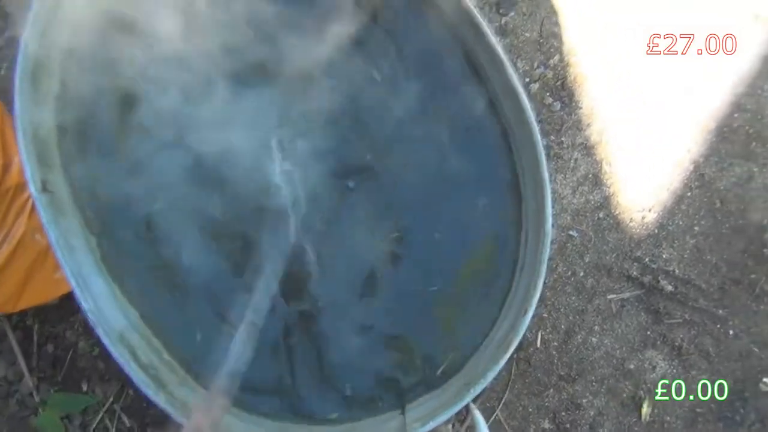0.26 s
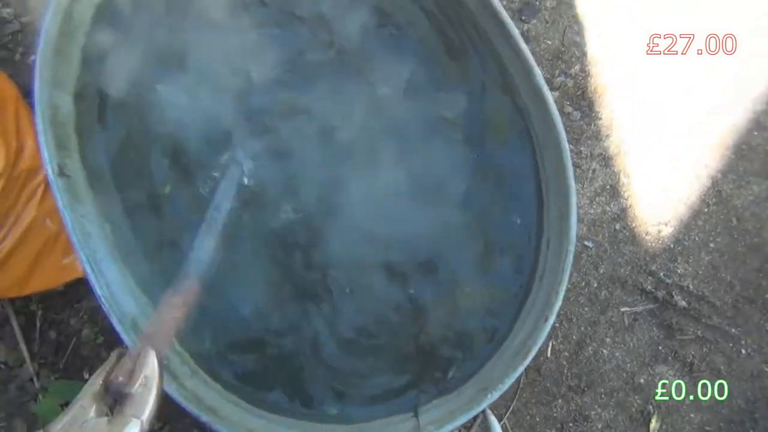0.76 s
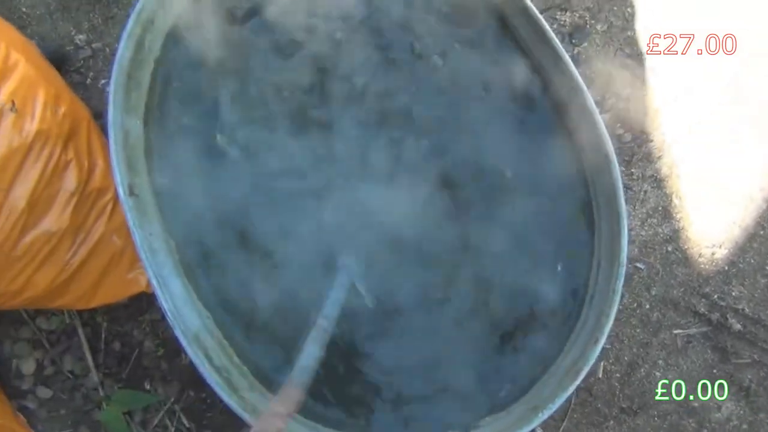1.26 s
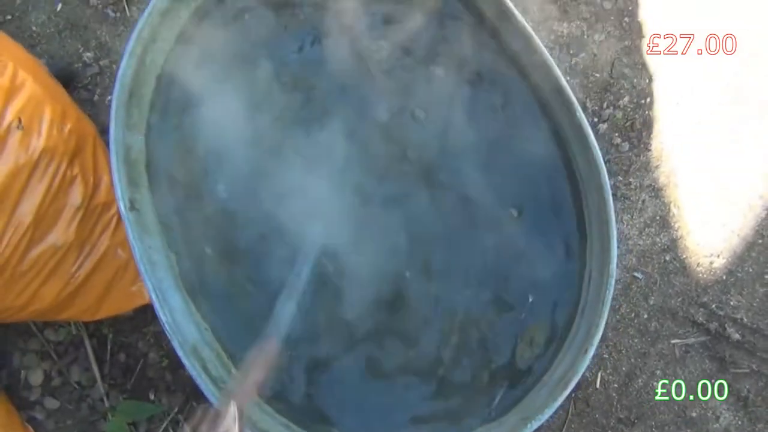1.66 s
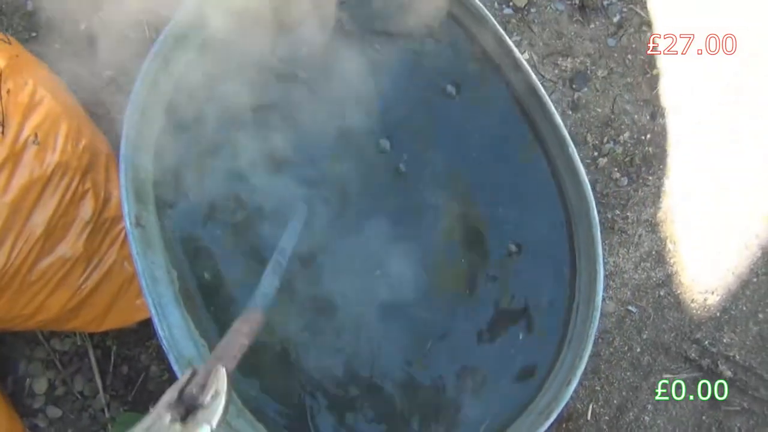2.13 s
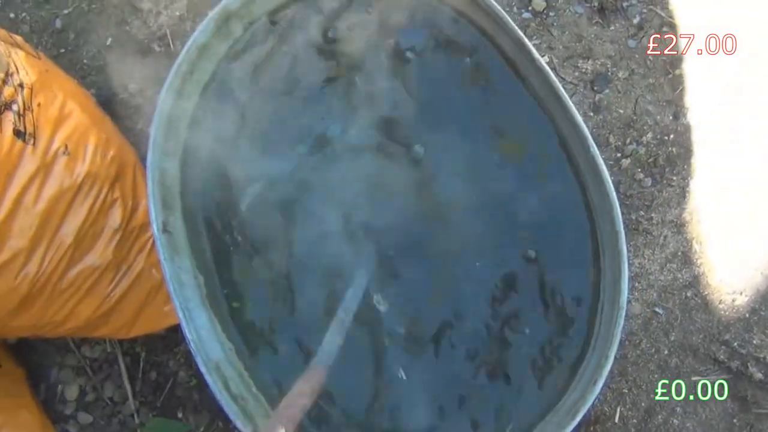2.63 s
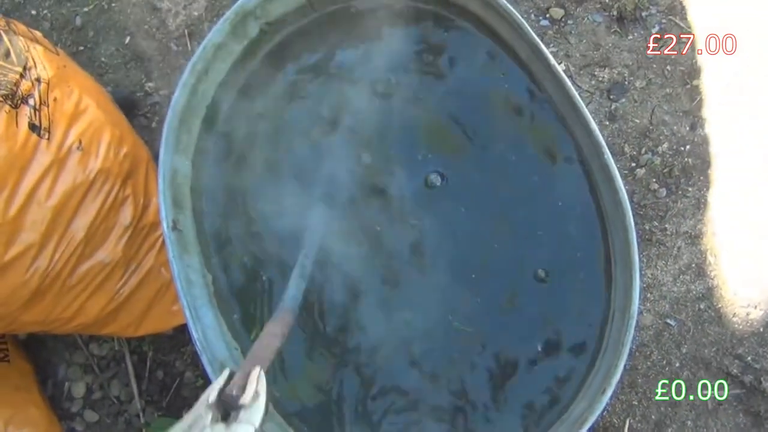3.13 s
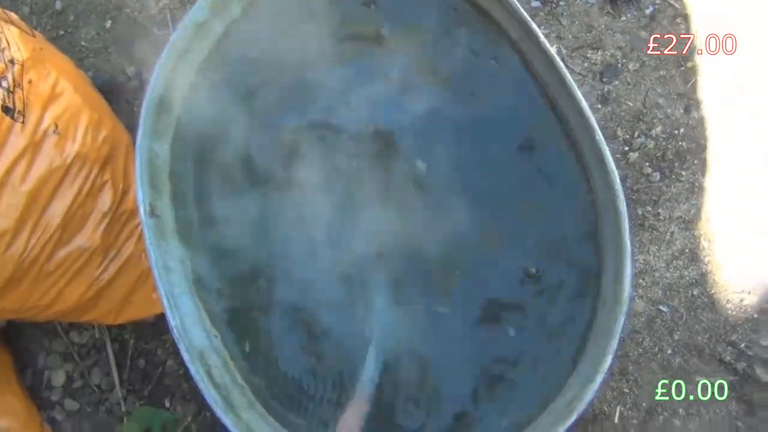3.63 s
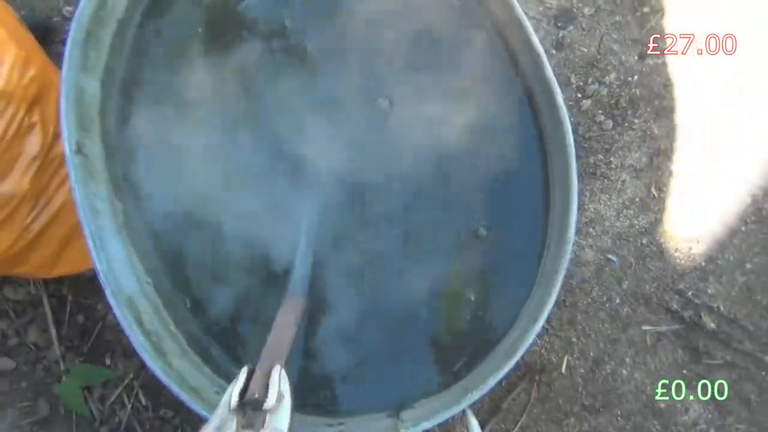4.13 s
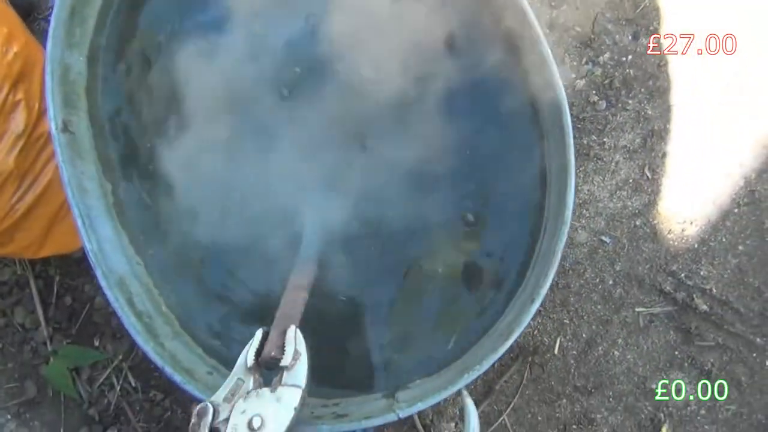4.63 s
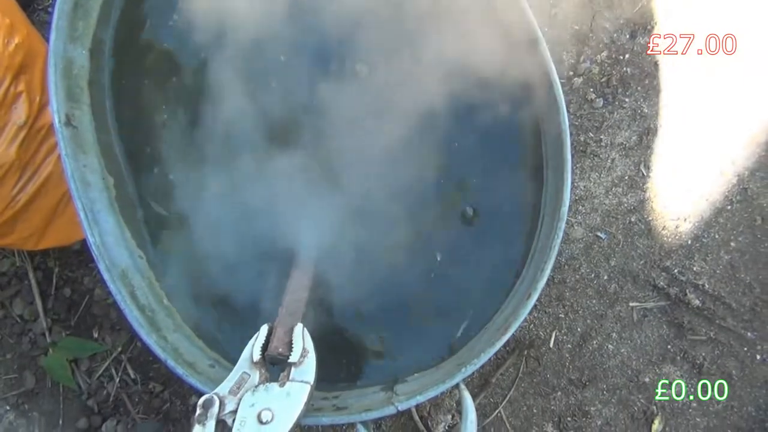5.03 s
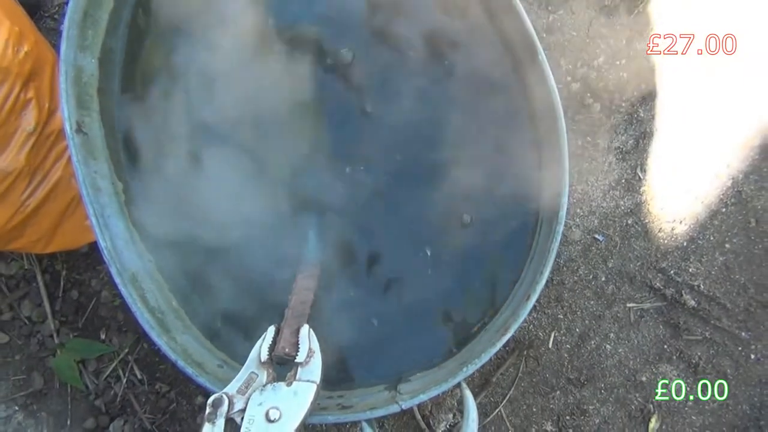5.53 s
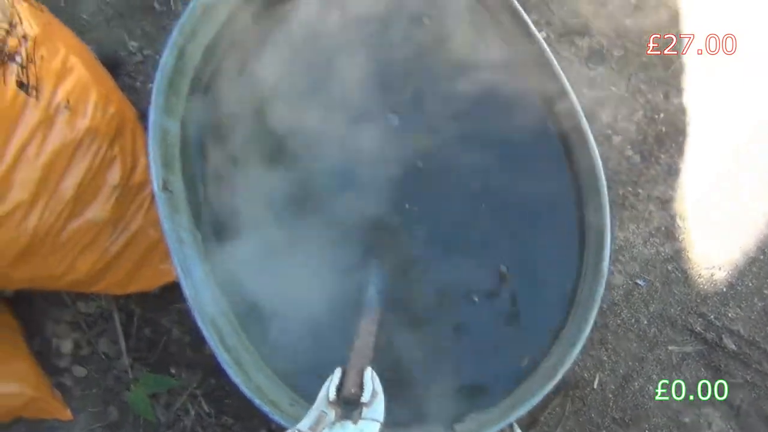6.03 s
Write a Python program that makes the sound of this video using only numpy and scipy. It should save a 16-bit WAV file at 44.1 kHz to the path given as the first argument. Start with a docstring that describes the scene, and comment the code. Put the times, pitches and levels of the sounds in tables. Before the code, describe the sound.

Close up, a hot metal bar sizzles and squawks in water, pushed deeper it cracks and gurgles roughly, then settles to simmering hiss.

```python
"""Hot steel bar stirred in a tub

A red-hot steel bar, held in tongs, is stirred in a tub of water in a yard, heard from close by.
Tiny steam bubbles hiss in surges, the water boils, and vapour pockets chirp as they swell and shrink.
Pushed deeper, the bar sheds its steam jacket in rough bursts and gurgles that ring the tub.
Noise and clicks drive filters and gliding resonances; a fast limiter holds down the loud moments."""
import sys
import numpy as np
from scipy import signal
from scipy.fft import rfft, irfft
from scipy.io import wavfile
from scipy.ndimage import uniform_filter1d

SR = 44100
rng = np.random.default_rng(int(sys.argv[2]) if len(sys.argv) > 2 else 0)


def master_out(mix):
    """Clip the mix to full scale and print it as 16-bit PCM to the path in sys.argv[1]."""
    frames = np.transpose(np.atleast_2d(mix))
    ceiling = np.clip(frames, -1, 1)
    pcm = np.round(ceiling * 32767).astype(np.int16)
    wavfile.write(sys.argv[1], SR, pcm)


N = 277389
TIME = np.arange(N) / SR
FRAME, HOP = 256, 64  # spectrogram frame and step [samples]


def gain_of(db):
    """Decibels to amplitude."""
    return 10 ** (np.asarray(db) / 20)


def evened(x):
    """Scales to rms 1."""
    return x / np.sqrt(np.mean(x ** 2) + 1e-20)


def read(points, hz):
    """Reads a spectrum on a log-frequency axis."""
    f, value = np.transpose(points)
    return np.interp(np.log(hz + 1), np.log(f + 1), value)


def add(mix, s, sound):
    """Mixes a sound in at s seconds."""
    part = mix[round(s * SR):][:len(sound)]
    part += sound[:len(part)]


def colour(x, points, size=4096):
    """Causal minimum-phase filter with the given spectrum: clicks keep their sharp fronts."""
    log_gain = np.log(gain_of(read(points, abs(np.fft.fftfreq(size, 1 / SR)))))
    taps = np.fft.ifft(np.exp(np.conj(signal.hilbert(log_gain)))).real
    return signal.oaconvolve(x, taps[:size // 2])[:len(x)]


def resonate(x, hz, width_hz):
    """One-pole resonance of gain 1 whose pitch can follow a curve."""
    turn = np.exp(2j * np.pi * np.cumsum(hz * np.ones(len(x))) / SR)
    r = np.exp(-np.pi * width_hz / SR)
    return 2 * (turn * signal.lfilter([1 - r], [1, -r], x / turn)).real


def sing(drive, hz, width_hz, steady):
    """A noisy resonance that partly sustains itself, so that its loudness evens out."""
    ring = resonate(resonate(drive, hz, width_hz), hz, width_hz)
    envelope = abs(signal.hilbert(ring)) + 1e-9
    return evened(ring / envelope ** steady)


def waver(rate_hz):
    """Slow random curve of rms 1, rolled off above the given rate."""
    hz = np.fft.rfftfreq(N, 1 / SR)
    return evened(irfft(rfft(rng.standard_normal(N)) / (1 + (hz / rate_hz) ** 2), N))


def spurts(per_s, dying_s):
    """Random curve that jumps up at chance moments and sinks back; rms 1 before its peaks are capped."""
    kicks = rng.exponential(1, N) * (rng.random(N) < per_s / SR)
    level = signal.lfilter([1], [1, -np.exp(-1 / (dying_s * SR))], kicks)
    return np.minimum(evened(level - level.mean()), 3)


def crackle(per_s, spread_db, share):
    """Collapsing bubbles: clicks of uneven size (share of the power) over a blur of countless small ones."""
    size = gain_of(spread_db * np.minimum(rng.exponential(1, N), 4))
    clicks = size * rng.choice([-1, 1], N) * (rng.random(N) < per_s / SR)
    return np.sqrt(share) * evened(clicks) + np.sqrt(1 - share) * rng.standard_normal(N)


def to_frames(x):
    """Sound to bin frequencies, frame times and spectrogram."""
    return signal.stft(x, SR, nperseg=FRAME, noverlap=FRAME - HOP)


def from_frames(z):
    """Spectrogram back to sound."""
    return signal.istft(z, SR, nperseg=FRAME, noverlap=FRAME - HOP)[1][:N]


def patches(shape, rate_hz, width_hz):
    """Random patches over frequency and time, rms 1."""
    across = np.fft.fftfreq(shape[0], SR / FRAME)[:, None] * width_hz
    along = np.fft.fftfreq(shape[1], HOP / SR) / rate_hz
    smooth = (1 + across ** 2) * (1 + along ** 2)
    return evened(np.fft.ifft2(np.fft.fft2(rng.standard_normal(shape)) / smooth).real)


# surges of steam as the stirred bar meets fresh water: (time [s], length [s], hiss level [dB], edge [s])
SURGES = [ (-0.05, 0.18, -15, 0.0024), (0.143, 0.32, -16.5, 0.0064), (0.477, 0.64, -17, 0.0043),
          (1.169, 0.11, -15.5, 0.014), (1.31, 0.15, -17.5, 0.0037), (1.458, 0.14, -16.5, 0.006),
          (1.681, 0.082, -18.5, 0.015), (1.848, 0.046, -25.5, 0.0055), (1.986, 0.084, -17.5, 0.0099),
          (2.104, 0.11, -21.5, .004), (2.28, .125, -16.5, .005), (2.47, .11, -18.5, 0.0043),
          (2.652, 0.099, -18, .0008), (2.805, 0.094, -18, 0.012), (2.984, 0.075, -15.5, 0.0082),
          (3.098, 0.16, -14.5, 0.0068), (3.351, .05, -20, 0.014), (3.573, 0.79, -12, 0.014),
          (4.42, 0.77, -19, 0.015), (5.283, .18, -17.5, 0.041), (5.647, 0.17, -20.5, 0.035),
          (5.981, 0.14, -18.5, 0.018), (6.28, 0.11, -26, 0.013)]
SIMMER_DB = -29.5  # hiss between surges
LINGER_S = 0.0081  # added to the falling edge


def steam_level_db():
    """Level of the hiss: each surge rises, holds and dies away over a faint simmer."""
    t = TIME[::16]
    power = gain_of(SIMMER_DB) ** 2
    for s, length_s, db, edge_s in SURGES:
        rise = .5 + .5 * np.tanh((t - s) / edge_s / 2)
        fall = .5 + .5 * np.tanh((s + length_s - t) / (edge_s + LINGER_S) / 2)
        power = power + gain_of(db) ** 2 * rise * fall
    return np.interp(TIME, t, 10 * np.log10(power))


# relative spectrum of the hiss: (frequency [Hz], density [dB per Hz])
HISS = [(500, -31), (1700, -31), (2500, -12.5), (3500, -12), (4300, -11.5), (5500, -10.5), (6500, -7.5),
        (7800, -2.5), (9300, -1), (11000, 2.5), (12500, 0), (14000, -3), (16000, -10.5)]
BUBBLE_DRIFT_HZ = 9  # how fast the bubble size drifts


def hiss(level_db, drift=0.022, patchy_db=1.76, flutter_db=1.0):
    """Tiny bubbles collapse on the steel; their size, and so the hiss's pitch, drifts as it is stirred."""
    hz, t, z = to_frames(crackle(per_s=5000, spread_db=1.5, share=0.16))
    shift = np.exp(drift * np.interp(t, TIME, waver(rate_hz=BUBBLE_DRIFT_HZ)))
    spectrum_db = read(HISS, hz[:, None] / shift)
    fizz = from_frames(z * gain_of(spectrum_db + patchy_db * patches(z.shape, rate_hz=9.9, width_hz=3600)))
    return evened(fizz) * gain_of(level_db + flutter_db * waver(rate_hz=140))


# modes of the tub of water: (frequency [Hz], width [Hz], relative level [dB])
TUB = [(240.4, 16, 3.5), (348.4, 4.9, 12), (389, 8.7, 4.5), (442, 25, 0), (516, 38, -9), (722, 7.5, -7),
       (1316, 14, 5), (1550, 13, -1.5), (1746, 21, 0), (2570, 58, 3), (3850, 110, 1)]


def tub(x, ring_db):
    """The tub and its water ring along with whatever shakes them."""
    ring = sum(gain_of(db) * resonate(x, hz, width_hz) for hz, width_hz, db in TUB)
    return x + gain_of(ring_db) * ring


# relative spectra of the small and of the large boiling bubbles: (frequency [Hz], density [dB per Hz])
SMALL = [(500, -46.5), (1000, -8.5), (1400, 0), (1800, 0), (3000, 0.5), (4300, -2), (5500, 1), (8000, -6),
         (15000, -48)]
LARGE = [(150, -19), (350, -16), (450, -4.5), (560, -0.5), (750, -2), (1050, -2), (1500, -6.5), (3000, -13),
         (15000, -84)]
# boiling before surges are added; eases as the steel cools, revives when it is pushed deeper:
# (time [s], small-bubble level [dB], large-bubble level [dB])
BOILING = [(0, -23.5, -31.5), (.2, -28, -34), (.75, -28, -35), (.88, -29.5, -40.5), (1.05, -29, -31),
           (1.25, -25.5, -39.5), (1.5, -37.5, -47), (1.6, -27, -37), (1.72, -36, -42), (1.9, -28.5, -39.5),
           (2.3, -38, -41.5), (2.55, -44, -40), (2.63, -50, -46), (2.72, -36, -36.5), (3.1, -37, -40.5),
           (3.24, -37, -43), (3.33, -54, -43), (3.5, -37, -37.5), (3.6, -30.5, -33), (4.3, -30, -34),
           (4.55, -26, -25.5), (4.95, -25.5, -32), (5.301, -27, -38), (6.05, -31.5, -39), (6.29, -45, -42)]


def boil(level_db, spectrum, patchy_db, sputter_db):
    """Bubbles sputter in clusters of like size and ring the tub a little."""
    _, _, z = to_frames(crackle(per_s=1400, spread_db=3.5, share=0.28))
    pops = from_frames(z * gain_of(patchy_db * patches(z.shape, rate_hz=25, width_hz=900)))
    pops = pops * gain_of(sputter_db * spurts(per_s=54, dying_s=0.012))
    return evened(tub(colour(pops, spectrum), ring_db=-12)) * gain_of(level_db)


def boiling(surge_db, small_follows=0.82, large_follows=0.75):
    """Small and large bubbles boil apart; both swell with each surge of steam."""
    s, small_db, large_db = np.transpose(BOILING)
    small_db = np.interp(TIME, s, small_db) + small_follows * surge_db
    large_db = np.interp(TIME, s, large_db) + large_follows * surge_db
    small = boil(small_db, SMALL, patchy_db=3.0, sputter_db=1.5)
    large = boil(large_db, LARGE, patchy_db=2.0, sputter_db=1.0)
    return small, large


# two broad modes of the steam sleeve round the bar: (frequency [Hz], width [Hz])
SLEEVE = [(1930, 830), (3600, 1330)]
# its ringing before surges are added: (time [s], lower mode level [dB], upper mode level [dB])
SLEEVE_RING = [(0, -46, -40), (.75, -34, -33.5), (.9, -33, -34), (1.25, -40, -39), (1.45, -45, -40),
               (1.58, -34, -33.5), (1.901, -38, -35.5), (2.3, -61, -35), (2.63, -60, -36),
               (2.78, -53, -32.5), (3.3, -63, -37), (3.65, -53.5, -28.5), (3.9, -40, -36.5),
               (6.29, -49, -40)]


def sleeve(surge_db, follows=0.75, flutter_db=2.0):
    """The sleeve of steam round the bar colours the sizzle and flutters as it forms and tears."""
    s, *levels_db = np.transpose(SLEEVE_RING)
    pops = crackle(per_s=2500, spread_db=2.5, share=0.35) * gain_of(flutter_db * waver(rate_hz=58))
    ring = np.zeros(N)
    for (hz, width_hz), db in zip(SLEEVE, levels_db):
        mode = evened(resonate(resonate(pops, hz, width_hz), hz, width_hz))
        ring += gain_of(np.interp(TIME, s, db)) * mode
    return ring * gain_of(follows * surge_db)


# relative spectrum of the outdoor rumble: (frequency [Hz], density [dB per Hz])
YARD = [(20, -13), (35, -5), (52, 5), (75, -9.5), (105, -4), (160, -6.5), (300, -6), (550, -9), (900, -11),
        (2000, -10.5), (6000, -9.5), (16000, -13.5)]
# level at which the rumble is heard, lowest at the start: (time [s], level [dB])
YARD_LEVEL = [(0, -39.5), (1.2, -32), (2.6, -33), (3.6, -32.5), (5.3, -31.5), (6.29, -33.5)]


def yard(hum_db=-55):
    """Low outdoor rumble with a faint wavering hum: filtered noise and a narrow noise resonance."""
    rumble = evened(colour(rng.standard_normal(N), YARD))
    hum = evened(resonate(rng.standard_normal(N), 55.0, width_hz=21))
    return gain_of(np.interp(TIME, *np.transpose(YARD_LEVEL))) * rumble + gain_of(hum_db) * hum


# vapour pockets: (time [s], swelling [s], shrinking [s], opening pitch [Hz], lowest pitch [Hz],
# closing pitch [Hz], level [dB], froth [0-1])
POCKETS = [ (.036, .05, .03, 2900, 2130, 2650, -25, .15), (.04, .014, .01, 2900, 2410, 2450, -24, .6),
           (.068, .022, .014, 5000, 4830, 4900, -25.5, .05), (.113, .005, .006, 2400, 2120, 3320, -16, 0),
           (0.16, 0.061, 0.064, 4700, 1320, 3000, -26, .7),
           (.275, .005, 0.0095, 2780, 2720, 3100, -24, 0.2), (.25, 0.014, 0.048, 560, 524, 680, -36, 0.1),
           (.32, 0.028, 0.035, 2730, 2500, 3120, -25.5, 1), (.343, .04, .057, 3040, 1640, 2400, -28, 0.6),
           (.358, .011, .045, 4900, 4600, 5200, -25.5, .2), (.472, .003, .004, 3300, 3250, 3600, -22.5, 0),
           (.491, 0.049, .006, 3580, 2020, 2050, -25.5, .25), (.51, .008, .007, 3700, 3300, 3400, -23, .1),
           (0.537, .006, .002, 6600, 5200, 5200, -24, .2),
           (.548, .025, 0.077, 1500, 1130, 1500, -30.5, 0.84),
           (.648, 0.016, .004, 3680, 2250, 2300, -25.5, 0.6),
           (.425, 0.0096, .007, 2350, 2200, 2250, -28, .1), (.714, .016, .018, 3180, 2900, 3600, -24.5, .5),
           (.831, .015, .012, 4200, 3600, 3900, -26, 0.3), (1.02, .007, .006, 1000, 800, 850, -31, .3),
           (1.142, .02, 0.0034, 3600, 2320, 2320, -28.5, 0.8),
           (1.163, 0.049, 0.007, 1800, 830, 850, -32, 0.44),
           (1.205, .009, .012, 2100, 1900, 2050, -27, 0.2), (1.215, .017, 0.038, 750, 485, 770, -33, .2),
           (1.355, .018, .003, 3400, 2360, 2350, -32, .4), (1.376, 0.012, .011, 806, 623, 660, -31.5, 0.15),
           (1.683, .008, .007, 880, 745, 760, -36.5, .2), (2.368, 0.0043, 0.0073, 950, 880, 1010, -30, 0),
           (3.699, .005, 0.008, 3550, 3300, 3500, -21, 0.05)]
GLIDE_STEEPNESS = 2.8  # pitch moves fastest while the pocket is small


def pockets(overtone=2.15, overtone_db=-5, upper=2.73, upper_db=-6):
    """A pocket's ring falls as it swells, rises as it shrinks; frothy ones squawk raggedly, others ring clear."""
    out = np.zeros(N)
    drive_noise, foam = rng.standard_normal((2, N))
    tremble, breaks = waver(rate_hz=170), waver(rate_hz=110)
    for s, swelling_s, shrinking_s, open_hz, low_hz, close_hz, db, frothy in POCKETS:
        t = np.arange(-swelling_s, shrinking_s, 1 / SR)
        now = slice(round(s * SR), round(s * SR) + len(t))
        smallness = abs(t / np.where(t < 0, swelling_s, shrinking_s)) ** GLIDE_STEEPNESS
        end_hz = np.where(t < 0, open_hz, close_hz)
        hz = low_hz * (end_hz / low_hz) ** smallness
        hz = hz * np.exp((.015 + .09 * frothy) * tremble[now])
        drive, width_hz = drive_noise[now], (.1 + .25 * frothy) * low_hz
        note = sing(drive, hz, width_hz, steady=1 - .5 * frothy)
        extras = .8 * sing(foam[now], 1.25 * hz, low_hz, steady=0)
        for ratio, ratio_db in ((overtone, overtone_db), (upper, upper_db)):
            partial_hz = np.minimum(ratio * hz, SR / 3)
            extras += gain_of(ratio_db) * sing(drive, partial_hz, overtone * width_hz, steady=.1)
        ragged = evened(gain_of((1.5 + 3 * frothy) * breaks[now])) * signal.windows.tukey(len(t), .2)
        add(out, s, gain_of(db) * (note + frothy * extras) * ragged)
    return out


def shelter(hush_db_per_s=40):
    """Gain of the small boiling: a pocket keeps water off the steel, the more so the longer it lives."""
    db = np.zeros(N)
    for s, swelling_s, shrinking_s, *_ in POCKETS:
        life_s = swelling_s + shrinking_s
        add(db, s, -hush_db_per_s * life_s * signal.windows.hann(round(life_s * SR)))
    return gain_of(db)


# the steam jacket closes over the steel, mostly choking the sound: (time [s], half width [s], gain [dB])
CHOKES = [(.128, 0.0095, 0), (.478, .011, -1.5), (1.645, 0.012, 0.5), (1.937, 0.014, -4),
          (2.25, 0.025, -2.5), (2.632, 0.02, -5), (2.94, .018, -7), (3.465, 0.022, -1)]


def choke():
    """Gain of hiss, boiling and sleeve: mostly brief dips as the steam jacket closes."""
    return gain_of(sum(db * np.exp(-((TIME - s) / half_width_s) ** 2) for s, half_width_s, db in CHOKES))


# relative spectrum of the rattle: (frequency [Hz], density [dB per Hz])
BURST = [(60, -43), (150, -3.5), (250, -5.5), (420, 0), (680, 4), (850, -1), (1200, 0.5), (1600, 2.5),
         (2300, 1), (4000, 7), (7000, 5.5), (15000, -16)]
# steam bursts: (time [s], level [dB], length [s], cavity pitch [Hz], crack level against cavity [dB])
BURSTS = [ (2.656, -31.5, 0.0089, 3900, -15), (3.037, -31, 0.015, 744, -2), (3.5102, -13, 0.032, 1490, 5),
          (3.59, -20.5, .004, 2830, -1), (3.7225, -17, 0.036, 1490, 0), (3.804, -28.5, .012, 1700, 13),
          (3.833, -27, 0.017, 1910, -2), (4.09, -15, 0.034, 1780, -3.5), (4.2954, -13, 0.0075, 1500, -1),
          (4.363, -25.5, 0.096, 1900, -1), (4.411, -23, 0.017, 596, 7), (4.431, -21.5, 0.072, 990, 1),
          (4.515, -18, 0.066, 1800, 6), (4.676, -19.5, .04, 1590, -13), (4.708, -17.5, .022, 1600, -10),
          (4.751, -19, 0.027, 1310, -2), (4.83, -30, 0.057, 575, 2), (4.884, -26.5, 0.04, 1210, -6)]
BURST_DYING_S, BURST_SAG_OCTAVES = 0.029, 0.4  # decay after length; pitch sinks as the cavity swells


def bursts(rough_db=0.5, damping=1.5, crack_s=0.022, rise_s=0.00029):
    """The steam jacket breaks with a broad crack, then rattles in a swelling cavity whose pitch sinks."""
    out, t = np.zeros(N), np.arange(SR // 3) / SR
    clicks = crackle(per_s=1700, spread_db=0, share=0.54)
    rattle = colour(clicks * gain_of(rough_db * waver(rate_hz=260)), BURST)
    for s, db, length_s, cavity_hz, crack_db in BURSTS:
        raw = evened(rattle[round(s * SR):][:len(t)])
        hz = cavity_hz * 2 ** (BURST_SAG_OCTAVES * (.5 - np.minimum(t / length_s, 1)))
        width_hz = damping * cavity_hz
        cavity = evened(resonate(resonate(raw, hz, width_hz), hz, width_hz))
        cavity = cavity * np.exp(-np.maximum(t - length_s, 0) / BURST_DYING_S)
        crack = gain_of(crack_db) * raw * np.exp(-t / crack_s)
        add(out, s, gain_of(db) * (cavity + crack) * (1 - np.exp(-t / rise_s)))
    return out


def pinch(depth=0.41, lead_s=0.0018, half_width_s=0.0014):
    """Gain of bursts and gurgles: they choke for an instant just before each new burst breaks out."""
    dips = [np.exp(-((TIME - s + lead_s) / half_width_s) ** 2) for s, *_ in BURSTS]
    return np.prod([1 - depth * dip for dip in dips], axis=0)


# echoes inside the tub: (delay [s], level [dB])
ECHOES = [(.0015, -14.5), (.00268, -9)]
# the bar goes under the rim: (start [s], end [s])
SINKING_S = 3.5, 5.0


def rim_echo(x):
    """As the bar goes deep, the tub's wall and floor throw the sound back, which hollows it."""
    echoes = sum(gain_of(db) * np.interp(TIME - delay_s, TIME, x) for delay_s, db in ECHOES)
    return x + np.interp(TIME, SINKING_S, [0, 1]) * echoes


# deep cavities at a nearly steady pitch: (time [s], length [s], pitch [Hz], level [dB])
GURGLES = [ (3.523, 0.039, 1680, -16.5), (3.54, 0.021, 520, -17), (3.591, 0.013, 2000, -20),
           (3.592, 0.014, 3700, -14.5), (4.296, 0.025, 560, -21), (4.408, 0.014, 560, -23),
           (4.44, 0.022, 593, -31), (4.481, 0.038, 607, -24.5), (4.527, .042, 1590, -19.5),
           (4.524, .055, 2170, -22), (4.591, 0.015, 2420, -28), (4.543, 0.053, 655, -24),
           (4.589, 0.055, 1860, -28.5), (4.662, 0.084, 1560, -21), (4.707, 0.042, 592, -19.5),
           (4.755, 0.069, 684, -20.5), (4.79, 0.16, 250, -41.5), (4.83, 0.18, 560, -35.5)]
GURGLE_RISE_OCTAVES = 0.059  # the cavity shrinks a little while it rings


def gurgles(damping=0.13, rough_db=2.5):
    """Deep under the water a large cavity throbs at its own pitch."""
    out = np.zeros(N)
    drive, throb = rng.standard_normal(N), gain_of(rough_db * waver(rate_hz=210))
    for s, length_s, pitch_hz, db in GURGLES:
        t = np.arange(0, length_s, 1 / SR)
        now = slice(round(s * SR), round(s * SR) + len(t))
        hz = pitch_hz * 2 ** (GURGLE_RISE_OCTAVES * (t / length_s - .5))
        ring = sing(drive[now], hz, damping * pitch_hz, steady=.7)
        add(out, s, gain_of(db) * evened(ring * throb[now]) * signal.windows.tukey(len(t), .35))
    return out


# a large cavity collapses and thumps the tub: (time [s], level [dB])
THUMPS = [(3.549, -24)]


def thumps(soft_hz=420):
    """A soft blow through the water leaves the tub's modes ringing, the high ones weakened."""
    out, t = np.zeros(N), np.arange(SR // 3) / SR
    ring = np.zeros(len(t))
    for hz, width_hz, db in TUB:
        strength = gain_of(db) / (1 + (hz / soft_hz) ** 2)
        ring += strength * np.exp(-np.pi * width_hz * t) * np.sin(2 * np.pi * hz * t)
    for s, db in THUMPS:
        add(out, s, gain_of(db) * ring)
    return out


# stereo width of the water and of the tub walls: (frequency [Hz], side against mid [dB])
WATER_WIDTH = [(50, -27), (140, -18), (300, -14), (700, -19), (1900, -23), (3400, -19.5), (5000, -18),
               (6500, -22.5), (9000, -20), (11000, -15), (15000, -14.5)]
WALL_WIDTH = [(50, -22), (140, -14), (350, -14), (700, -21), (2000, -22), (4000, -19), (8000, -20)]


def scatter(x, width, t60_s=0.053):
    """Reflections off the rim, the ground and the yard, which differ from left to right."""
    t = np.arange(SR // 4) / SR
    paths = rng.standard_normal(len(t)) * gain_of(-60 * t / t60_s)
    return colour(signal.oaconvolve(x, paths / np.linalg.norm(paths))[:N], width)


def scene():
    """The tub sounds from the middle; bursts shake its walls, which spread wider in the bass."""
    hiss_db = steam_level_db()
    surge_db = hiss_db - np.median(hiss_db)
    small, large = boiling(surge_db)
    sizzle = rim_echo(small * shelter() + sleeve(surge_db))
    water = (hiss(hiss_db) + sizzle + large) * choke() + pockets() + yard()
    walls = tub((bursts() + gurgles()) * pinch(), ring_db=-3.5) + thumps()
    mid = water + walls
    side = scatter(water, WATER_WIDTH) + scatter(walls, WALL_WIDTH)
    return np.array([mid + side, mid - side])


EDGE_HZ = 15950  # band limit


def record(dry, threshold_db=-14.0, recovery_db_per_s=170):
    """A fast limiter ducks everything when loud, recovers steadily and rounds peaks; then a low-pass."""
    power_db = 10 * np.log10(abs(uniform_filter1d((dry ** 2).mean(0), size=130)) + 1e-12)
    fall_db = TIME * recovery_db_per_s
    held_db = np.maximum.accumulate(power_db + fall_db) - fall_db
    over_db = np.maximum(held_db - threshold_db, 0)
    ducked = dry / gain_of(uniform_filter1d(over_db, size=50))
    rounded = ducked / (1 + (ducked / .7) ** 4) ** (1 / 4)
    low_pass = signal.firwin(511, EDGE_HZ, window=("kaiser", 9), fs=SR)
    return signal.oaconvolve(rounded, low_pass[None], "same")


dry = scene()
out = record(dry)
master_out(out)
```